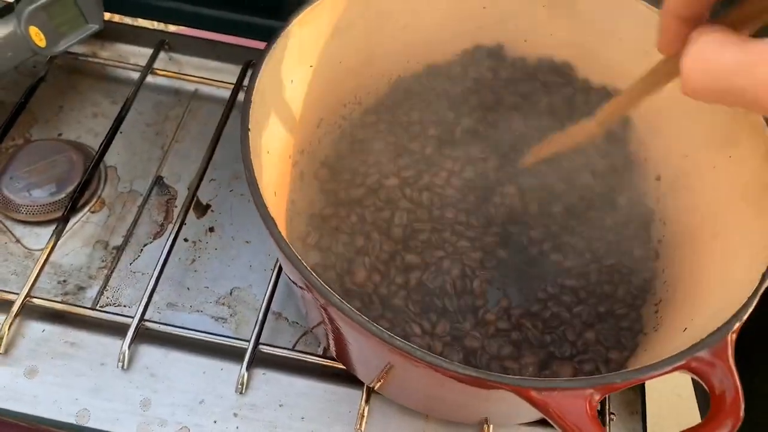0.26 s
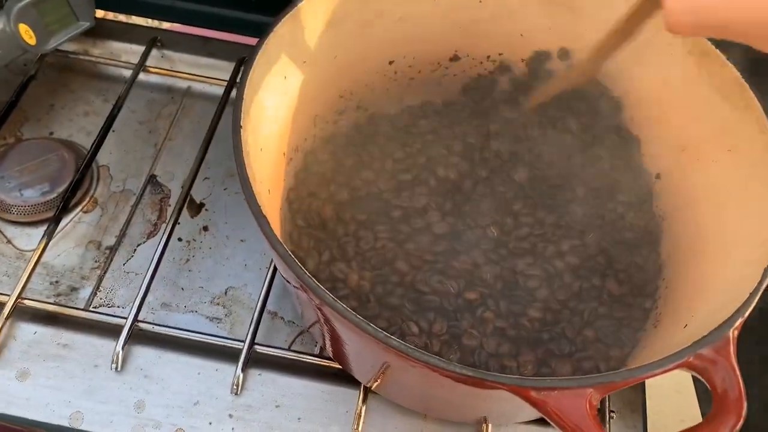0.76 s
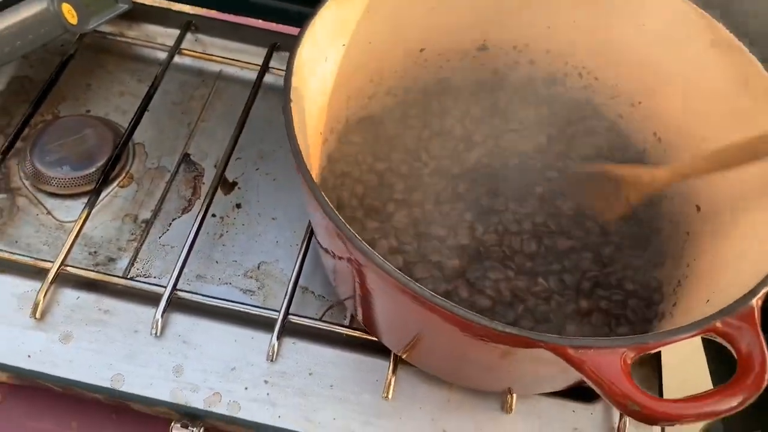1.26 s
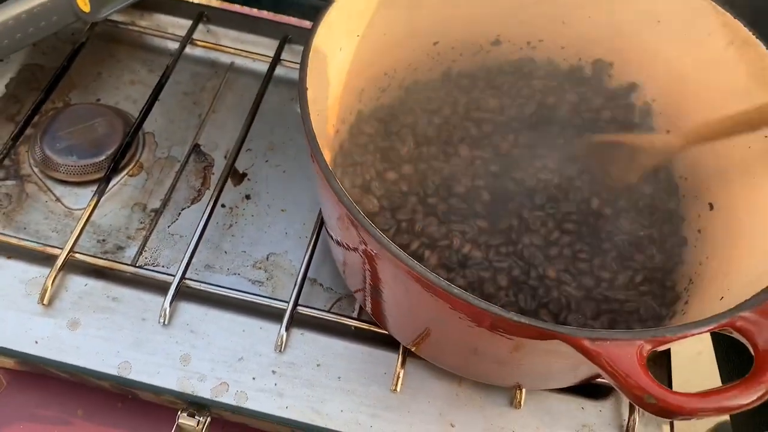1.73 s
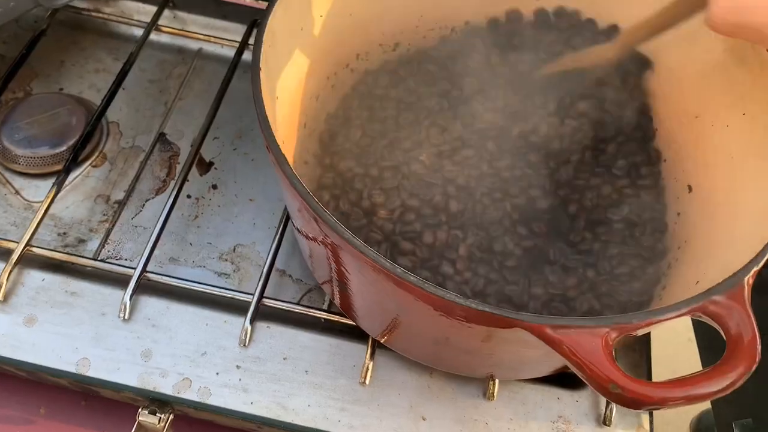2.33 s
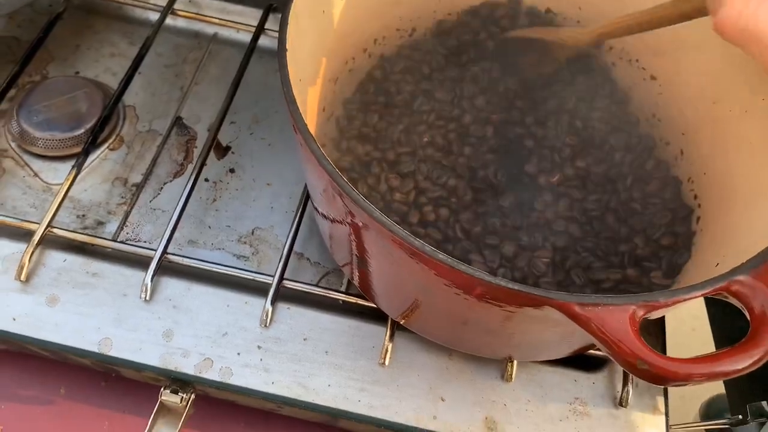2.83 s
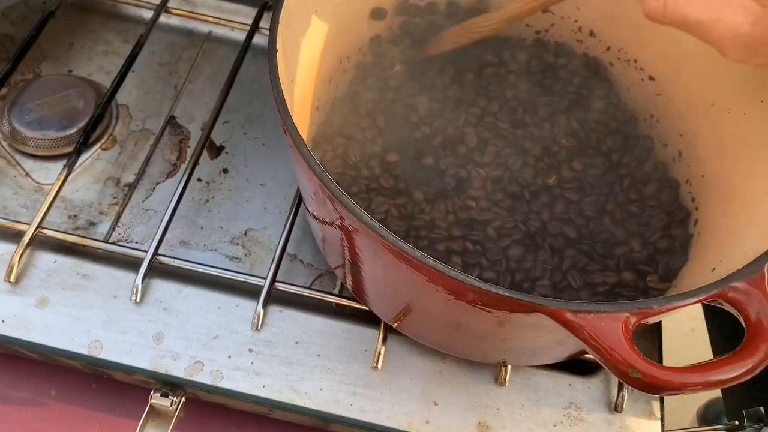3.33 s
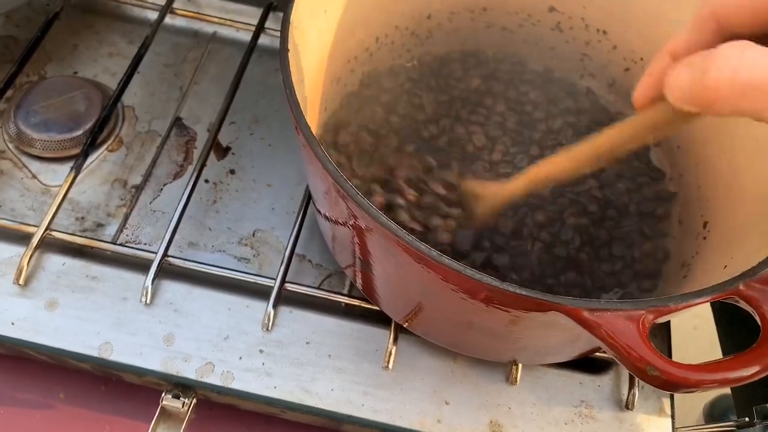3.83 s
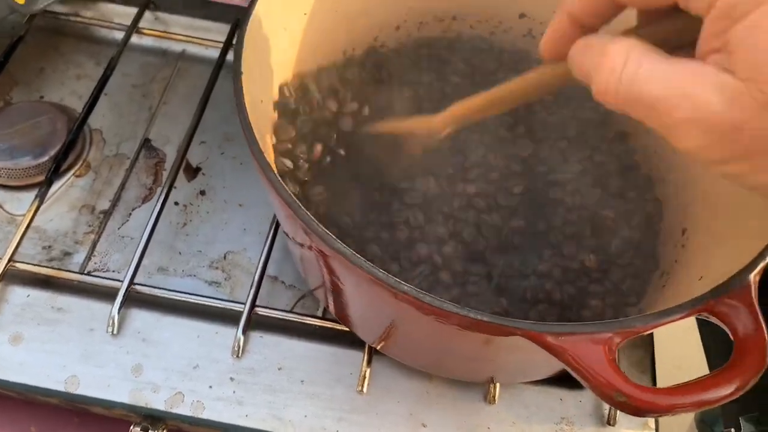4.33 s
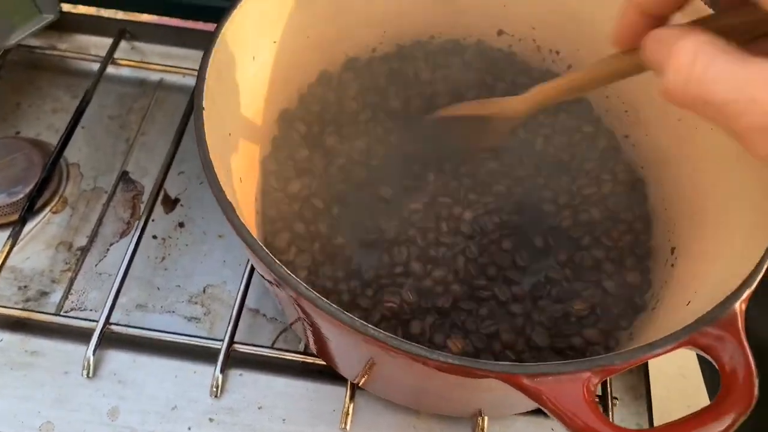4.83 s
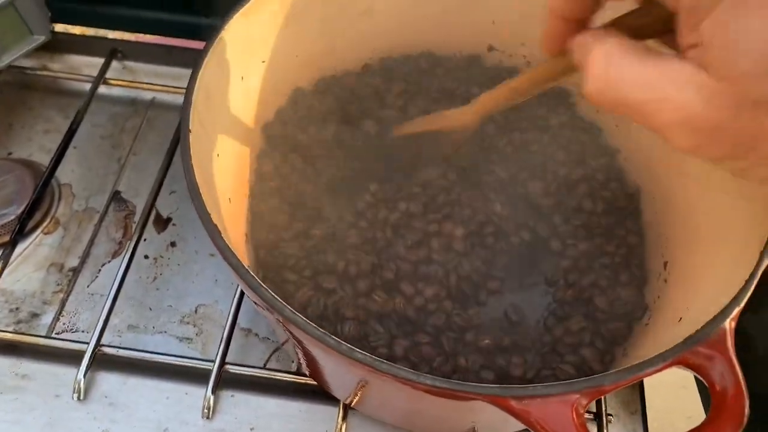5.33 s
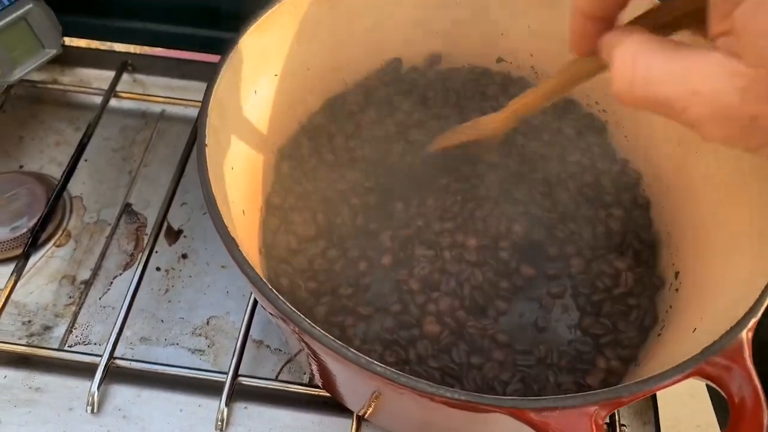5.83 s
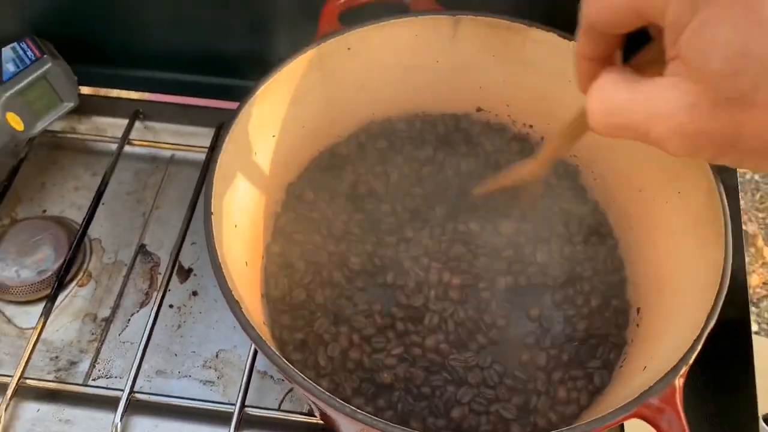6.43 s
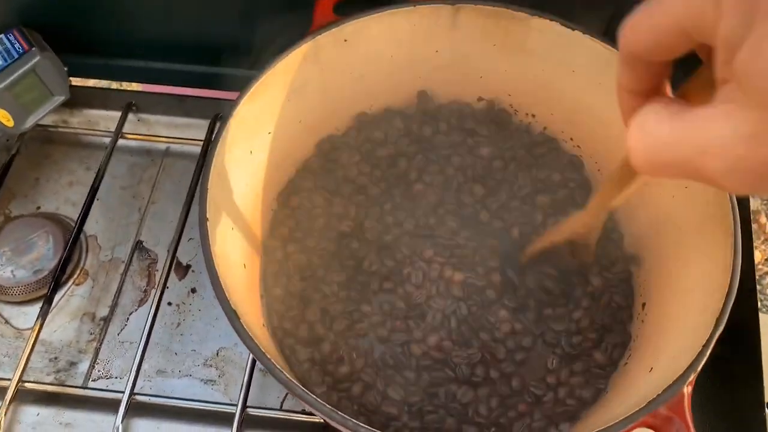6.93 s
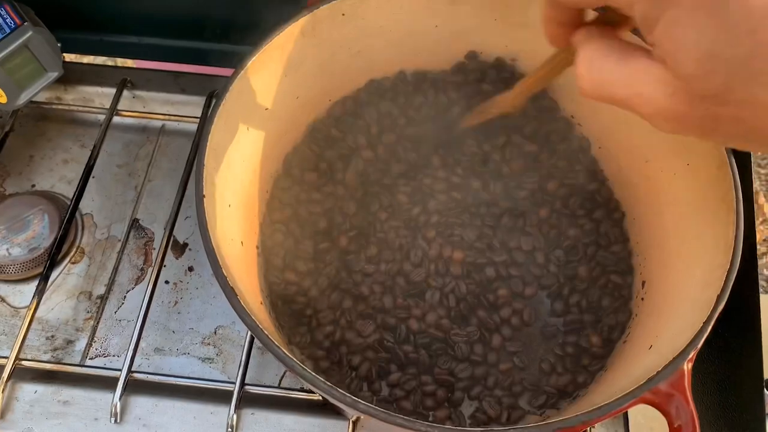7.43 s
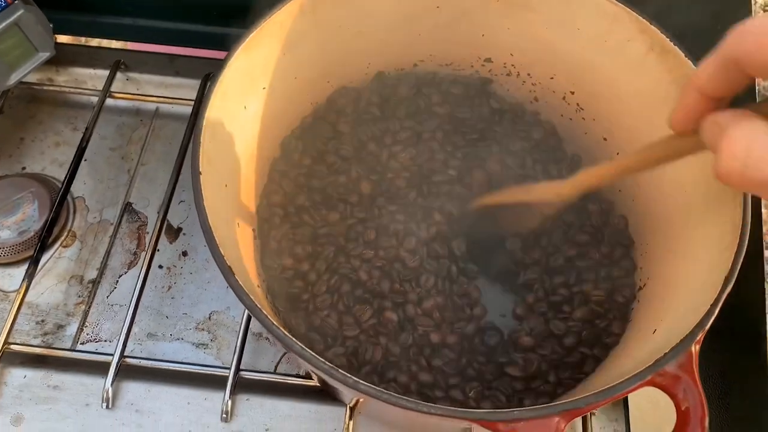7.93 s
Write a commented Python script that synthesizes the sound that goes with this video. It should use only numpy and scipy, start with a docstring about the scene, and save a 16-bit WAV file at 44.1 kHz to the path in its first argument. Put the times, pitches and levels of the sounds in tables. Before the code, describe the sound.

Heard very close in stereo: hard dry beans tumble and grind round a thick pot, swelling and ebbing with each rapid spoon stroke. Crisp pops and small high clicks stand out, along with duller wooden tocks and a brief low judder of the shaft. The pot wall rings thinly. Under it all a quiet gas flame rumbles with slight hiss. Outdoors, no room echo, stirring continuous until a sudden end.

```python
"""Roasting coffee beans tumble in an enamelled iron pot on a camping stove outdoors, heard close by.
Dense random contacts make the rustle and drive the wall's modes; a wooden spoon shoves the beans along.
The spoon rubs the bottom in slips, knocks now and then, and its shaft judders. Single beans snap in short
noise bursts or click as decaying tones. Filtered noise is the burner's rumble and hiss below.
A pair of microphone ports hears it all, with phase, balance and likeness set for each frequency."""
import sys
import numpy as np
from scipy import signal
from scipy.fft import rfft, irfft, next_fast_len
from scipy.io import wavfile
from scipy.ndimage import uniform_filter1d

SR = 44100
rng = np.random.default_rng(int(sys.argv[2]) if len(sys.argv) > 2 else 0)


def wrap_up_sound(samples):
    """Save the sound to the file named by the first command line argument, as 16-bit audio."""
    columns = np.atleast_2d(samples).T
    # keep every value between -1 and 1, then stretch to whole-number steps
    tamed = np.clip(columns, -1, 1)
    steps = np.round(tamed * 32767).astype(np.int16)
    wavfile.write(sys.argv[1], SR, steps)


N = 360297
T = np.arange(N) / SR  # time in s
SIZE = next_fast_len(N + 8192)  # transform length, with room for filter tails
HZ = np.maximum(np.arange(SIZE // 2 + 1) * SR / SIZE, 1)


def from_db(db):
    """Decibels to gain."""
    return 10 ** (np.asarray(db) / 20)


def rms_one(x):
    """Scale to unit power."""
    return x / np.sqrt(np.mean(x ** 2) + 1e-20)


def over_hz(rows, axis=1):
    """One column of a table, read along log frequency."""
    rows = np.array(rows)
    return np.interp(np.log(HZ), np.log(rows[:, 0]), rows[:, axis])


def filtered(x, response):
    """Pass a signal through a frequency response."""
    return irfft(rfft(x, SIZE) * response, SIZE)[..., :N]


def unit_gain(response):
    """Scale a response so that white noise keeps its power."""
    return response / np.sqrt(np.mean(abs(response) ** 2))


def resonance(hz, width):
    """Response of one damped mode, 1 at its top."""
    return 1 / (1 + 1j * (HZ ** 2 - hz ** 2) / (HZ * width))


def ringing(x, hz, width_hz):
    """Drive one damped mode, gain 1 at its top."""
    keep = np.exp(-np.pi * width_hz / SR)
    feed = np.array([1, 0, -1]) * (1 - keep ** 2) / 2
    feedback = [1, -2 * keep * np.cos(2 * np.pi * hz / SR), keep ** 2]
    return signal.lfilter(feed, feedback, x)


def drift(rate):
    """Random wander of unit power, drawn afresh rate times a second and joined by straight lines."""
    knots = rng.standard_normal(8192)
    return rms_one(np.interp(T * rate, np.arange(len(knots)), knots))


def swells(rows):
    """Power of bell-shaped swells; a length is the width at half power."""
    power = np.zeros(N)
    for s, db, length in rows:
        near = abs(T - s) < 3 * length
        power[near] += from_db(db) ** 2 * np.exp2(-(2 * (T[near] - s) / length) ** 2)
    return power


def contacts(per_s, spread_db):
    """Energies of random contacts, many light and a few hard; mean power 1."""
    hit = rng.random(N) < per_s / SR
    energy = hit * from_db(spread_db * np.minimum(rng.exponential(1, N), 3)) ** 2
    return energy / energy.mean()


def dying(energy, decay_s):
    """Each contact's energy dies away exponentially."""
    keep = np.exp(-1 / (decay_s * SR))
    return signal.lfilter([1 - keep], [1, -keep], energy + 1e-14)


def stirring():
    """Each stroke swells and ebbs, rolling the beans and rubbing the bottom; gives both levels in dB."""
    # Strokes of the spoon. Each row: middle in seconds, length in seconds,
    # relative level of the rub on the bottom in dB, relative level of the tumbling beans in dB.
    strokes = [(0.07, 0.16, -47.5, -27.5), (0.254, 0.049, -46.5, -31.5), (0.362, 0.039, -71, -27),
               (0.549, 0.079, -67, -31), (0.688, 0.075, -51, -36), (0.817, 0.082, -43.5, -37.5),
               (0.9, 0.035, -43, -28.5), (0.986, 0.046, -37, -28.5), (1.202, 0.11, -39, -26.5),
               (1.422, 0.077, -39.5, -28), (1.701, 0.13, -41, -28), (1.865, 0.1, -45.5, -34),
               (2.006, 0.07, -47.5, -34.5), (2.156, 0.1, -53, -29), (2.465, 0.11, -43, -32.5),
               (2.532, 0.049, -41, -26.5), (2.783, 0.091, -46, -32.5), (2.873, 0.071, -48.5, -31),
               (2.988, 0.056, -54, -39), (3.278, 0.083, -59, -27.5), (3.39, 0.064, -45.5, -31.5),
               (3.535, 0.15, -45, -34.5), (3.763, 0.1, -42.5, -25.5), (3.953, 0.054, -37, -30.5),
               (4.19, 0.16, -42.5, -31.5), (4.404, 0.082, -38, -28), (4.68, 0.18, -39, -27),
               (4.883, 0.071, -39.5, -26), (5.096, 0.14, -39, -29.5), (5.265, 0.075, -42.5, -27.5),
               (5.357, 0.065, -40, -27.5), (5.56, 0.12, -39.5, -28), (5.77, 0.12, -41.5, -29),
               (5.91, 0.032, -47, -25), (6.02, 0.11, -59, -29.5), (6.111, 0.095, -38, -31.5),
               (6.279, 0.066, -41.5, -35), (6.414, 0.063, -41.5, -32), (6.636, 0.1, -37, -25.5),
               (6.738, 0.016, -40.5, -33), (6.885, 0.11, -43, -28.5), (7.062, 0.06, -37, -25.5),
               (7.155, 0.063, -40, -29), (7.292, 0.086, -48, -29.5), (7.486, 0.12, -47.5, -34.5),
               (7.57, 0.05, -63, -27.5), (7.67, 0.052, -50, -44), (7.756, 0.039, -35, -28.5),
               (7.898, 0.075, -44.5, -31.5), (8.117, 0.15, -47, -38)]
    # beans follow the spoon a little late and keep rolling for longer than the stroke (a factor)
    bean_lag_s, bean_stretch = 0.0059, 1.264
    # between strokes the spoon still drags and beans still trickle
    drag_db, trickle_db = -55, -40
    # the spoon lifts once: both levels sink, then it digs in again, clear_s after the lift began
    lift_s, lift_db, settle_s, clear_s, dig_in_s = 2.255, -6, 0.022, 0.088, 0.1

    rub = swells([(s, db, length) for s, length, db, _ in strokes])
    tumble = swells([(s + bean_lag_s, db, length * bean_stretch) for s, length, _, db in strokes])
    sinking = np.clip((T - lift_s) / settle_s, 0, 1)
    returning = np.clip((T - lift_s - clear_s) / dig_in_s, 0, 1)
    dip_db = lift_db * (sinking - returning)
    tumble_db = 10 * np.log10(tumble + from_db(trickle_db) ** 2) + dip_db
    rub_db = 10 * np.log10(rub + from_db(drag_db) ** 2) + dip_db
    return tumble_db, rub_db


def beans(tumble_db, clump_db=1.2, click_db=-14.5):
    """Loose beans rustle with a few clicks, shoved beans grind; contacts of both set the wall ringing."""
    # Colour of bean contacts. Each row: frequency in Hz, relative level in dB per Hz.
    bean_colour = [(300,-23),(1000,-15.5),(1950,-14),(2500,-6.5),(2900,-9.5),(3400,-4),(4500,-0.5),(5700,-6.5),(6700,3),(8500,1),(10000,-0.5),(12000,-4),(13200,-9.5),(15600,-8)]
    loose = from_db(tumble_db - 4.5 + clump_db * drift(70)) ** 2
    ground = from_db(-4.0) ** 2 * shove_power()
    energy = loose * contacts(per_s=1300, spread_db=3.4)
    energy += ground * contacts(per_s=5000, spread_db=3.5)
    force = filtered(rattle(energy), unit_gain(from_db(over_hz(bean_colour))))
    bounces = from_db(click_db) * np.sqrt(loose) * light_clicks()
    return wall(reflections(force)) + bounces


def shove_power(rise_s=0.001):
    """A shove along the enamel breaks loose quickly; its power falls away as a half bell."""
    # Beans shoved along the enamel. Each row: start in seconds, relative level in dB, length in seconds.
    shoves = [(0.062, -22, 0.011), (0.435, -22.5, 0.014), (0.672, -26.5, 0.036), (0.915, -23, 0.014),
              (1.115, -28, 0.027), (1.472, -19, 0.0036), (1.503, -19.5, 0.03), (1.662, -19.5, 0.0044),
              (1.676, -20.5, 0.013), (2.618, -26, 0.024), (2.704, -27, 0.028), (2.846, -32.5, 0.029),
              (3.099, -31.5, 0.044), (3.174, -21, 0.0061), (3.36, -24.5, 0.012), (3.664, -22.5, 0.005),
              (3.835, -24.5, 0.068), (3.994, -18.5, 0.0043), (4.006, -19.5, 0.044), (4.284, -21.5, 0.043),
              (4.46, -22, 0.041), (4.495, -18, 0.013), (4.717, -23, 0.041), (4.844, -18.5, 0.0082),
              (5.399, -22, 0.037), (6.095, -21, 0.0064), (6.445, -25.5, 0.033), (6.661, -24, 0.0073),
              (6.901, -18, 0.0083), (6.918, -24, 0.0069), (7.5205, -18, 0.0042), (8.011, -30, 0.0098)]
    power, t = np.zeros(N), T[:SR // 5]
    for s, db, length in shoves:
        at = round(s * SR)
        shove = from_db(db) ** 2 * (1 - np.exp(-t / rise_s)) * np.exp(-(t / length) ** 2)
        power[at:at + len(t)] += shove[:N - at]
    return power


def rattle(energy, rub_s=0.00035, decay_s=0.00035, tail_s=0.025, tail_share=0.03,
           colour_db=2.0, patchy_db=1.6):
    """Bean contacts: brief scratches, each with its own colour and a faint tail from the pot."""
    at, spectrum = np.flatnonzero(energy), 0
    edges = np.geomspace(2000, 13000, num=10)  # band edges in Hz
    for low, high in zip([0, *edges], [*edges, SR]):
        own = energy.copy()
        own[at] *= from_db(colour_db * rng.standard_normal(N)[at]) ** 2
        own = dying(own, rub_s)  # rough skins slide into contact, which softens the attack
        power = dying(own, decay_s) + tail_share * dying(own, tail_s)
        place = from_db(patchy_db * drift(28))  # the colour shifts with the spot where beans hit
        scratches = np.sqrt(power) * place * rng.standard_normal((2, N))
        spectrum = spectrum + rfft(scratches, SIZE) * ((HZ >= low) & (HZ < high))
    return irfft(spectrum, SIZE)[:, :N]


def reflections(x, longest_s=0.004, moves_per_s=22, count=12):
    """Short wall echoes change with the spot where beans collide, so the hollow colour keeps shifting."""
    out, power = x.copy(), 1
    for share in rng.uniform(.06, 1, count):
        lag = 1 + int(share * longest_s * SR)
        gain = drift(moves_per_s) / np.sqrt(count)
        out[:, lag:] += gain[lag:] * x[:, :-lag]
        power = power + gain ** 2
    return out / np.sqrt(power)


def wall(force, width_hz=28, shift_db=4.5):
    """Each mode of the iron wall answers more or less as the beans travel round the pot."""
    # Thin ringing of the iron wall. Each row: frequency in Hz, relative height above the rattle in dB.
    wall_modes = [(2454,10.5),(3283,12.5),(3359,12.5),(3479,8),(3565,14.5),(4123,9),(4554,6.5),(5242,9),(5383,11),(5534,10.5),(5986,14.5),(6540,4),(6901,3),(7127,6.5),(7751,5),(10691,9)]
    out = force
    for hz, db in wall_modes:
        answer = from_db(np.minimum(shift_db * drift(8), 6))
        out = out + (from_db(db - 3.5) - 1) * ringing(force * answer, hz, width_hz)
    return out


def light_clicks(per_s=70, spread_db=8.5):
    """Light bounces at random moments; power 1."""
    at = np.flatnonzero(rng.random(N - 1024) < per_s / SR)
    return rms_one(clicks(np.column_stack([T[at], spread_db * rng.standard_normal(N)[at]])))


def clicks(rows):
    """A bean that bounces freely rings for an instant, all beans at nearly the same pitch."""
    # spread is a share of the pitch, from bean to bean
    click_hz, spread, ring_s, rise_s = 6620, 0.018, 0.0016, 0.000087
    out, t = np.zeros((2, N)), T[:1024]
    envelope = np.exp(-t / ring_s) * (1 - np.exp(-t / rise_s))
    for (s, db), (detune, *phases) in zip(rows, rng.standard_normal((len(rows), 3))):
        turns = click_hz * (1 + spread * detune) * t + np.array(phases)[:, None]
        at = round(s * SR)
        out[:, at:at + len(t)] += from_db(db) * envelope * np.sin(2 * np.pi * turns)
    return out


def bouncing_beans():
    """Single beans bounce and click at set moments, each a short decaying tone."""
    # Each row: start in seconds, level in dB.
    bounces = [(2.699,-15),(6.040,-21),(6.056,-23),(6.4965,-21),(6.5025,-14.5),(6.5115,-23),(6.5295,-21),(6.6405,-19),(6.6432,-18),(6.9225,-13),(7.2925,-16),(7.3135,-18),(7.339,-18)]
    return clicks(bounces)


def wall_notes():
    """The rough skin of a bean dragged along the wall keeps one resonance going while it slides."""
    # Each row: middle in seconds, level in dB, length in seconds, frequency in Hz, width in Hz.
    notes = [(0.14,-33.5,0.018,6070,70),(0.258,-36,0.043,4120,260),(1.539,-36,0.053,3420,100),(1.52,-41,0.023,6760,60),(2.634,-39,0.047,3450,120),(2.868,-53,0.09,2450,30),(4.018,-34,0.016,5340,700),(4.299,-31,.04,7020,90),(6.926,-32,0.028,6400,250),(7.582,-54,0.12,2440,30),(7.583,-55,0.051,3800,300)]
    out = np.zeros((2, N))
    for s, db, length, hz, width_hz in notes:
        near = abs(T - s) < .13
        sung = ringing(rng.standard_normal((2, SR // 2)), hz, width_hz)
        note = rms_one(sung[:, -near.sum():])  # the last part, when the mode has built up
        out[:, near] += from_db(db) * np.exp2(-2 * ((T[near] - s) / length) ** 2) * note
    return out


def snaps(burst_s=0.00029, tail_s=0.0015, tail_db=-12, split_hz=8500):
    """A bean snaps in a very short noise burst with a brief tail; brighter bursts are shorter."""
    # Single beans snapping or striking the wall.
    # Each row: start in seconds, relative level in dB, relative brightness in dB.
    snap_rows = [(.0608,-27,-14),(0.5035,-14.5,10.5),(1.086,-28,16),(1.99,-26.5,2),(2.2586,-22.5,0),(2.262,-15,11),(2.6936,-25.5,-13),(3.48,-19.5,5),(3.6185,-26,-5),(3.714,-12.5,-1),(4.1126,-23.5,-3),(4.4622,-20.5,2),(4.523,-26,1),(4.903,-19.5,2),(5.2245,-22.5,-21),(5.987,-24,-10),(6.126,-24,-2),(6.398,-31,6),(6.6662,-19,-3),(6.695,-14.5,19),(7.4235,-17,7.5),(7.926,-22,-4)]
    out, t = np.zeros((2, N)), T[:1024]
    dull = signal.butter(2, [3200, split_hz], "band", fs=SR, output="sos")
    sharp = signal.butter(2, [split_hz, 14500], "band", fs=SR, output="sos")
    for s, db, bright_db in snap_rows:
        age = t / (burst_s * from_db(-.4 * bright_db))
        envelope = (1 - np.exp(-2 * age)) * (np.exp(-age) + from_db(tail_db) * np.exp(-t / tail_s))
        low, high = rng.standard_normal((2, 2, len(t))) * envelope
        burst = signal.sosfilt(dull, low) + from_db(bright_db + 2.0) * signal.sosfilt(sharp, high)
        at = round(s * SR)
        out[:, at:at + len(t)] += from_db(db - 9.5) * rms_one(burst)
    return out


def rubbing(rub_db, shift_db=2.0):
    """Wood and trapped beans slip over the bottom; each low resonance varies as the spoon travels."""
    # Broad resonances of the rubbed pot. Each row: frequency in Hz, width in Hz, relative level in dB.
    rub_modes = [(302,18,-4),(425,12,-8),(769,26,0),(840,80,-5),(1178,115,6.5),(1522,40,1),(1705,130,0.5),(2450,330,1.5)]
    slip_power = dying(contacts(per_s=700, spread_db=2.0), decay_s=0.0016)
    slips = np.sqrt(slip_power) * rng.standard_normal((2, N))
    force = rfft(from_db(rub_db - 0.34) * slips, SIZE)
    modes = [from_db(db) * resonance(hz, width) for hz, width, db in rub_modes]
    power = np.mean(abs(sum(modes)) ** 2)
    answers = [irfft(force * mode, SIZE)[:, :N] * from_db(shift_db * drift(14)) for mode in modes]
    return sum(answers) / np.sqrt(power)


def knocks(tock_peak_s=0.0017, rise_s=0.0011, reach=1.5):
    """A wooden tock rings the pot's low modes and jolts the stove; a lower tock reaches fewer high modes."""
    # The spoon knocks on the pot. Each row: start in seconds, level in dB,
    # pitch of the wooden tock in Hz, relative level of the stove's thud in dB.
    knock_rows = [(0.505,-38.5,1270,-65),(0.6811,-33.5,1260,-49),(2.2612,-41,1110,-59),(2.71,-38,880,-53),(3.481,-48,1210,-54),(3.714,-40,1100,-55),(4.7206,-18,1230,-46.5),(5.886,-30,865,-49),(6.856,-30.5,1360,-49.5),(6.859,-37,880,-59),(7.765,-40,1250,-74)]
    # What the pot rings with. Each row: frequency in Hz, relative level in dB, 60 dB decay in seconds.
    knock_modes = [(785,-9.5,0.1),(828,0,0.019),(1170,-4,0.066),(1584,-4.5,0.072),(1760,-14.5,0.076)]
    # The stove under the pot. Each row: frequency in Hz, relative level in dB, 60 dB decay in seconds.
    stove_modes = [(298,4,0.41),(356,2,0.22),(417,4.5,0.21)]
    out, t = np.zeros(N), T[:SR // 4]
    for s, db, tock_hz, thud_db in knock_rows:
        pulse = t / tock_peak_s * np.exp(1 - t / tock_peak_s)
        tock = from_db(db) * pulse * np.sin(2 * np.pi * tock_hz * t)
        modes = [(hz, from_db(db + mode_db) / np.hypot(1, (hz / (reach * tock_hz)) ** 2), t60)
                 for hz, mode_db, t60 in knock_modes]
        modes += [(hz, from_db(thud_db + mode_db), t60) for hz, mode_db, t60 in stove_modes]
        ring = sum(gain * from_db(-60 * t / t60) * np.sin(2 * np.pi * (hz * t + rng.random()))
                   for hz, gain, t60 in modes)
        at = round(s * SR)
        out[at:at + len(t)] += tock + (1 - np.exp(-(t / rise_s) ** 2)) * ring
    return out


def judders(waver=0.027, rasp_hz=370, rasp_width_hz=130, rasp_db=-5, drag_s=0.075):
    """The shaft sticks and slips at its bending pitch: a short wavering groan in a longer dull rasp."""
    # Each row: middle in seconds, relative level in dB, length in seconds, pitch in Hz.
    rows = np.array([(0.407,-49,0.0099,290),(0.46,-42.5,0.017,296),(0.576,-51.5,0.012,305),(2.718,-56,0.0082,300),(3.163,-46.5,0.012,277),(3.195,-50.5,0.015,277),(3.443,-48.5,0.014,300)])
    power, hz = swells(rows[:, :3]), np.interp(T, rows[:, 0], rows[:, 3])
    groan = np.sqrt(power) * np.sin(2 * np.pi * np.cumsum(hz * (1 + waver * drift(70))) / SR)
    rasp = filtered(rng.standard_normal(N), unit_gain(resonance(rasp_hz, rasp_width_hz) ** 2))
    rasp_power = abs(uniform_filter1d(power, int(drag_s * SR)))
    return from_db(10.5) * groan + from_db(rasp_db) * np.sqrt(rasp_power) * rasp


def burner():
    """Low rumble of the flame with a faint hiss: noise shaped in frequency, its level drifting slowly."""
    # Colour of the burner. Each row: frequency in Hz, relative level in dB per Hz.
    burner_colour = [(20,-28),(38,-18),(52,-8.5),(61,0.5),(70,-4.5),(88,-5.5),(106,-5),(120,-7),(175,-14),(260,-8.5),(330,-15),(480,-32.5),(1000,-32.5),(16000,-61)]
    # Strength of the flame's sound. Each row: time in seconds, level in dB.
    flame = [(0,-47),(1.4,-49),(1.9,-46.5),(2.4,-48.5),(3,-48),(3.5,-46),(5,-48.5),(6.6,-48),(6.85,-48),(7.8,-47.5),(8.17,-56.5)]
    roar = filtered(rng.standard_normal((2, N)), unit_gain(from_db(over_hz(burner_colour))))
    return from_db(np.interp(T, *np.transpose(flame))) * roar


def throb(s=5.4, db=-55, length_s=2.4, hz=62, width_hz=24):
    """For a while the flame's rumble swells into a deep throb, narrow noise round one low pitch."""
    deep = filtered(rng.standard_normal(N), unit_gain(resonance(hz, width_hz) ** 2))
    return np.sqrt(swells([(s, db, length_s)])) * deep


def ports(pair):
    """Sound meets the two ports with a phase gap; scattered sound makes them less alike."""
    # Balance of the ports. Each row: frequency in Hz, left over right in dB.
    balance = [(150,0),(350,1),(650,-0.5),(1250,5.5),(1550,10),(1950,-1),(3400,0),(4800,-3.5),(5700,-4),(6600,-2),(7600,0)]
    # Each row: frequency in Hz, phase of left behind right in radians, likeness of the ports from 0 to 1.
    port_rows = [(334,0.5,1),(626,0.3,0.23),(1170,0.12,.92),(1880,1.24,0.17),(2300,-0.1,0.42),(3050,-2.5,0.31),(4470,-.5,0.43),(5500,2.5,0.12),(6260,-0.63,0.64),(7120,1.57,0.46),(8510,3,1),(10040,5,0.77),(10650,5.5,1),(11900,8.5,1),(12700,5.5,1),(14100,11,0.99),(14400,16,1)]
    direct, scattered = rfft(pair, SIZE)
    alike = np.clip(over_hz(port_rows, axis=2), 0, 1)
    mid = np.sqrt((1 + alike) / 2) * direct
    side = 1j * np.sqrt((1 - alike) / 2) * scattered
    # each port takes half of the level difference and half of the phase gap
    lean = from_db(over_hz(balance) / 2) * np.exp(-.5j * over_hz(port_rows, axis=1))
    return irfft(np.array([(mid + side) * lean, (mid - side) / lean]), SIZE)[:, :N]


def scene():
    """Everything sounds from the pot and the flame under it, and reaches the two ports."""
    tumble_db, rub_db = stirring()
    loose_beans = beans(tumble_db) + bouncing_beans() + wall_notes() + snaps()
    spoon = rubbing(rub_db) + knocks() + judders()
    flame_sound = burner() + throb()
    return ports(loose_beans + spoon + flame_sound)


def record(dry):
    """The sound fades at the end, the loudest peaks are rounded, the top is cut steeply."""
    fade_s, fade_db_per_s, cutoff_hz = 8.11, 300, 16100
    faded = dry * from_db(-fade_db_per_s * np.maximum(T - fade_s, 0))
    rounded = .9 * np.tanh(faded / .9)
    top_cut = signal.ellip(10, .1, 70, cutoff_hz, fs=SR, output="sos")
    return signal.sosfilt(top_cut, rounded)


dry = scene()
out = record(dry)
wrap_up_sound(out)
```